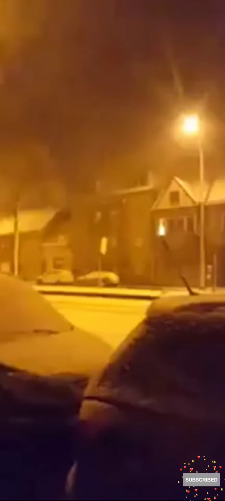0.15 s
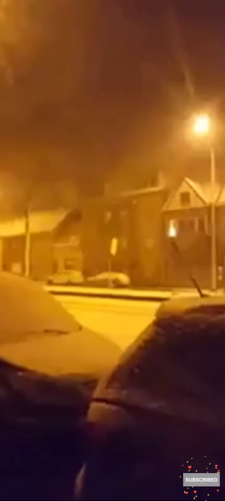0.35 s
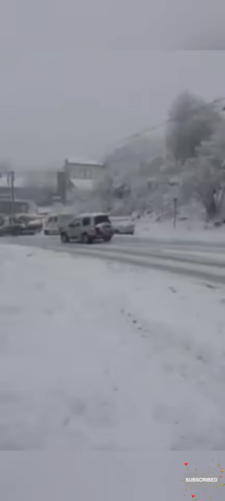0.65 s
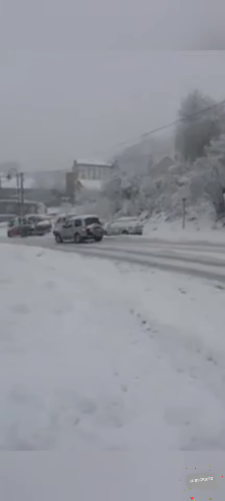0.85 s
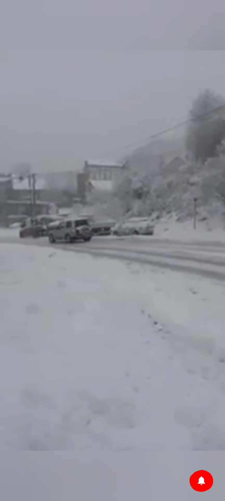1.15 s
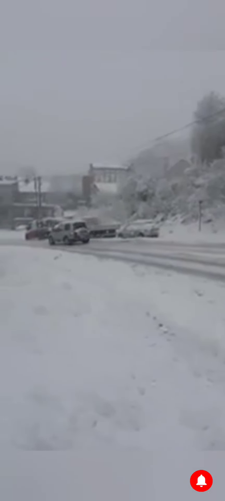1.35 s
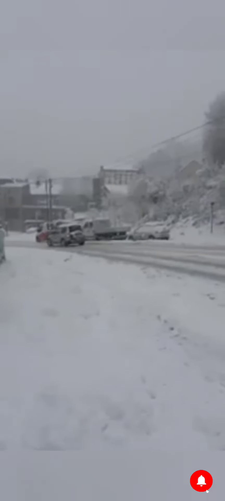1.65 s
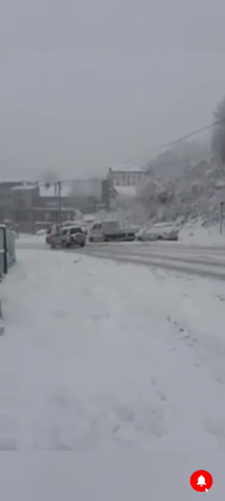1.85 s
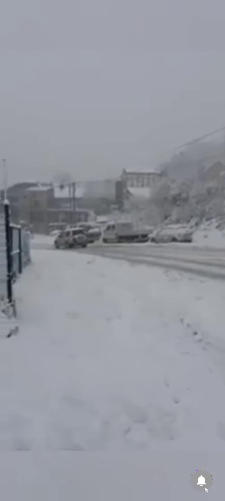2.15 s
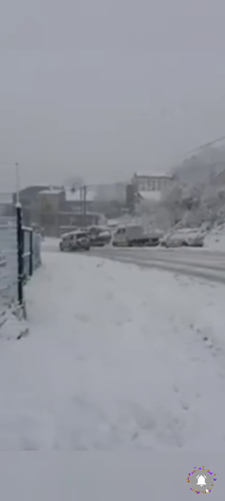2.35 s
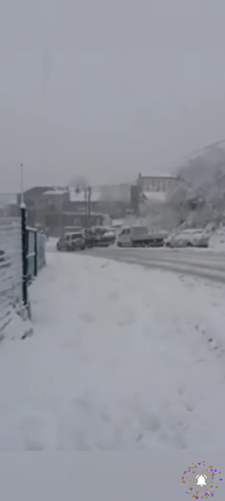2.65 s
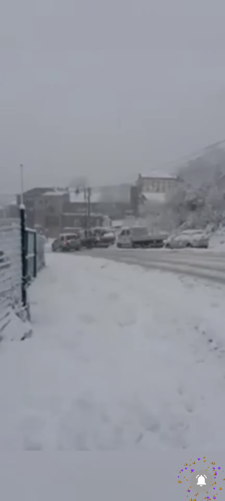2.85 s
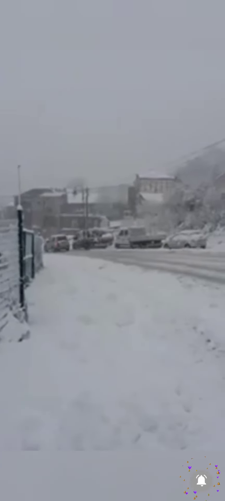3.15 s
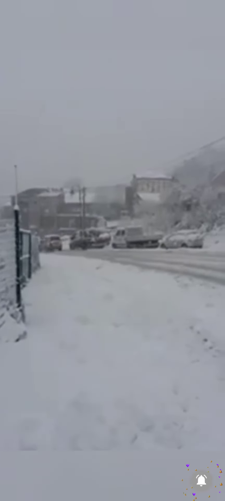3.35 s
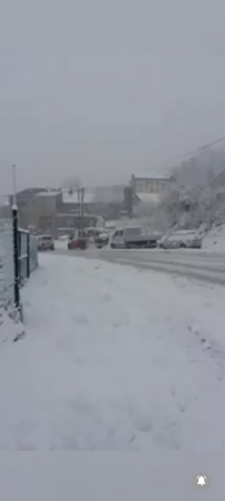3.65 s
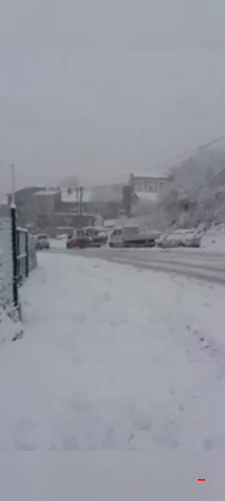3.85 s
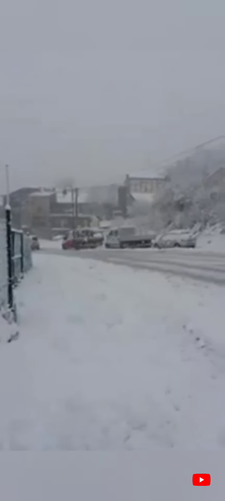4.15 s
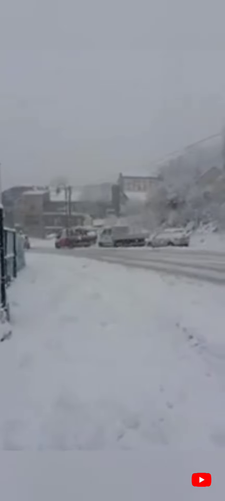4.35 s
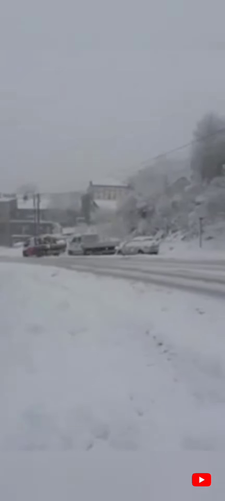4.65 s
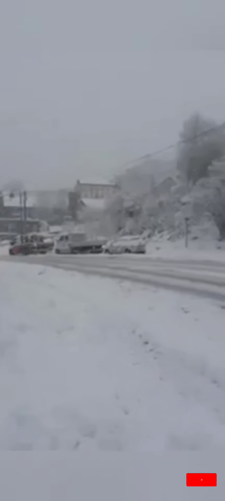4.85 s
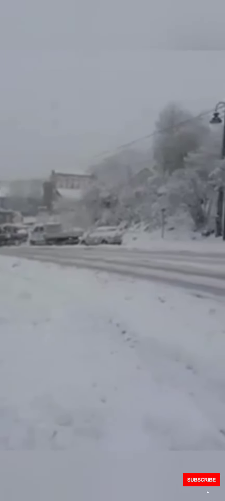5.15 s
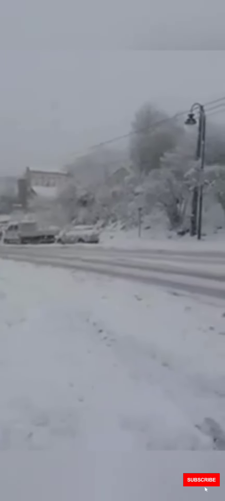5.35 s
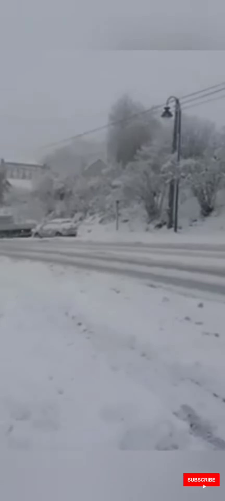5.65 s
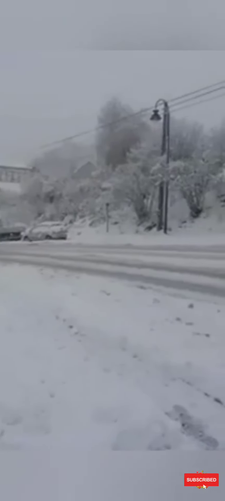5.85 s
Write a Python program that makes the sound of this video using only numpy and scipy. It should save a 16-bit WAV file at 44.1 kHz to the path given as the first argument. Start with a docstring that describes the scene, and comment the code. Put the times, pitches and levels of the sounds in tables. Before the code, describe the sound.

After a moment of quiet, strong wind buffets the microphone and hisses in gusts, with snow ticking and an engine idling faintly.

```python
"""Quiet night air in a snowy street, then a click on the phone and a moment of silence.
A storm gust hits the phone's microphone head on, buffets it and settles into a rushing hiss.
Eddies and blown snow strike the narrow microphone port and take its colour; the port whistles
and sings, and knocks ring the case. Some way off, an engine idles under the wind."""
import sys
import numpy as np
from scipy import signal
from scipy.fft import rfft, irfft
from scipy.io import wavfile
from scipy.ndimage import uniform_filter1d

SR = 44100
rng = np.random.default_rng(int(sys.argv[2]) if len(sys.argv) > 2 else 0)


def inscribe(sig):
    """Save sig as 16-bit PCM at rate SR to the path in sys.argv[1].

    A 1-D sig is mono; a 2-D sig holds one channel per row.
    Samples are clipped to [-1, 1] before scaling.
    """
    pcm = np.round(np.clip(np.atleast_2d(sig).T, -1, 1) * 32767)
    wavfile.write(sys.argv[1], SR, pcm.astype(np.int16))


N = 264908
T, HZ = np.arange(N) / SR, np.fft.rfftfreq(N, 1 / SR)
CLICK_S, NIGHT_END_S, WIND_START_S, PUFF_END_S = .2572, .307, .939, .981

# Levels in the tables are relative; spectra give the level per hertz.
# distant night air: frequency_hz, level_db
NIGHT_SPECTRUM = [(25, -39.5), (60, -15.5), (170, -18), (250, -15.5), (350, -23.5), (800, -24.5),
                  (1850, -30), (2700, -40.5), (4500, -46.5), (6300, -54), (8200, -45), (9800, -45),
                  (11500, -52), (15500, -53)]
# its rise and fall: time_s, level_db
NIGHT_LEVEL = [(0.0, -54.5), (0.114, -49.5), (0.224, -53), (0.256, -52), (0.3, -48.5)]
# light knock on the phone: frequency_hz, level_db
CLICK_SPECTRUM = [(100, 9), (1500, -2), (3000, -16), (6000, -25), (8200, -12), (14000, -15), (16000, -30)]
# partials of the engine down the street: pitch_hz, level_db, waver_hz
ENGINE_PARTIALS = [(39, 2, 0.091), (30, -20, 1.8), (69.5, -2, 4.48), (100, -9.5, 0.63), (131.2, -11, 2.06)]
# street rumble: frequency_hz, level_db
RUMBLE_SPECTRUM = [(15, -37), (30, -13), (60, 7), (100, -15), (160, -1.5), (300, -15), (1000, -68)]
# engine and rumble at the microphone: time_s, level_db
ENGINE_LEVEL = [(2.7, -59), (2.95, -48.5), (6.0, -45)]
# colour of the microphone port: frequency_hz, gain_db
PORT_RESPONSE = [(100, -17), (180, -16.5), (300, -2), (560, -5.5), (900, -14), (1850, -3), (2550, -6),
                 (3080, -16), (5200, -12.5), (7000, -10.5), (8250, 0), (10400, -14.5), (12900, -25),
                 (14300, -65)]
# narrow peaks and dips of port and case: centre_hz, width_hz, gain_db
PORT_RINGS = [(648, 7.7, 4), (1317, 200, 2), (1990, 290, 3), (2430, 260, 5), (5030, 280, 1.5),
              (5750, 570, -5), (8600, 110, 2.5)]
# knocks that ring the case: start_s, pitch_hz, level_db, decay_ms
CASE_KNOCKS = [(1.5377, 1710, -17.5, 6.2), (3.023, 520, -22, 22), (4.308, 2150, -12.5, 3.1)]
# spells of whistling at the port's edge: start_s, end_s, level_db
WHISTLE_SPELLS = [(0.967, 0.985, -20.5), (1.026, 1.074, -30.5), (1.614, 1.85, -47)]
# hoarse tones of air blowing across the port: pitch_hz, width_hz, level_db
SINGING_TONES = [(1972, 140, 2), (2652, 136, 5), (5204, 95, -5.5)]
# hollow moan as the gust dies away: time_s, pitch_hz, level_db
MOAN_GLIDE = [(1.2, 660, -60), (1.249, 617.5, -22.5), (1.309, 608.5, -25.5), (1.349, 506.6, -66),
              (1.411, 425, -25.5), (1.45, 370, -70), (1.49, 337, -44), (1.56, 278, -55)]
# snow and small eddies striking the port: start_s, strength_db, tilt_db (up is brighter), decay_ms
SNOW_STRIKES = [(1.0821, -7.5, 0, 3.7), (1.106, -7, -19, 1.6), (1.219, -8, 10, 1.9), (1.2908, -8, -3, 4.5),
                (1.3973, -19, 8, 4.5), (1.471, -16.5, -3, 3.4), (1.5357, -21.5, 11, 2.7),
                (1.6306, -25, -12, 4.1), (1.9071, -21, -18, 2.9), (2.029, -26, 3, 3.8),
                (2.2458, -16.5, 1, 1.35), (2.717, -20, 13, 2.1), (2.7455, -16.5, 11, 1.6),
                (2.871, -21, -4, 6.7), (2.9311, -16, -18, 5.3), (3.0200, -6.5, 3, 2.4),
                (3.0254, -14, -5, 6.7), (3.1394, -15.5, 18, 2.4), (3.3987, -10, -20, 2.7),
                (4.0590, -10, -13, 3.2), (4.307, -13, 0, 1.2), (4.6729, -17, 5, 1.3),
                (4.8042, -13.5, 12, 2.4), (5.5174, -17.5, 12, 1.7), (5.6258, -17, 5, 1.7),
                (5.9194, -15, 16, 2.5)]
# the wind surges, lulls and settles: time_s, force_db, rush_lift_db
WIND_FORCE = [(1.0, -61, 1.5), (1.018, -35.5, 0), (1.075, -27.5, -0.5), (1.14, -17, 3.5), (1.28, -23, -2),
              (1.331, -21.5, -3.5), (1.52, -28, -3.5), (1.66, -42, 4), (2.0, -41, 3.5), (2.67, -35.5, 2),
              (2.8, -30, -1), (3.6, -27.5, 1.5), (4.25, -30, 0.5), (4.6, -32.5, -2), (4.87, -27, -4),
              (5.48, -29, -2), (5.62, -25, -3), (6.0, -28, 0)]
# low roar against that force: time_s, level_db
ROAR_LEVEL = [(1.0, -9.5), (1.2, -4.5), (1.34, -11), (1.65, -8.5), (2.3, -9), (2.85, -12), (3.4, -11),
              (4.55, -9), (4.9, -11), (6.0, -11)]
# fine fizz against the hiss: time_s, level_db
FIZZ_LEVEL = [(0.95, -15), (1.3, -40), (1.8, -24), (2.3, -21.5), (3.0, -20), (4.1, -21), (4.5, -16.5),
              (6.0, -17)]
# gusts riding on the wind: middle_s, length_s, lift_db, brightness (0 roar to 1 hiss)
GUSTS = [(1.049, 0.045, 5, 0), (1.257, 0.07, 5, 0.92), (1.405, 0.045, 8.5, 0.25), (1.484, 0.14, 7, 0.11),
         (1.932, 0.14, 3, 0.36), (2.104, .16, 4, 1), (2.235, 0.18, 6, 0.68), (2.35, .09, 4.5, .55),
         (2.922, 0.11, 5, 0.46), (3.05, 0.12, 8, 0.78), (3.322, 0.087, 5.5, 0.024), (3.406, 0.29, 5, 1),
         (3.6, 0.1, 3, 0.037), (3.819, 0.18, 4.5, 1), (4.0, .06, 1.5, 0), (4.317, 0.13, 3, 0.55),
         (4.42, 0.19, 9.5, 0.72), (4.598, 0.052, 6, 0.56), (5.143, 0.067, 4.5, 0.57), (5.168, .06, 3, 0),
         (5.368, 0.097, 3.5, 0.92), (5.56, 0.06, 6.5, 0.66), (5.689, .1, 14.5, 0.68),
         (5.918, .11, 6.5, 0.75)]
# the gust that hits the port head on: frequency_hz, level_db
BUFFET_SPECTRUM = [(20, -29), (60, 9.5), (150, 6.5), (220, 4.5), (900, 0), (3000, -32), (6000, -13.5),
                   (15000, -38)]
# its blows: time_s, level_db
BUFFET_LEVEL = [(1.085, -27.5), (1.147, -26), (1.177, -23), (1.199, -36), (1.227, -23), (1.307, -35),
                (1.32, -41)]


def amp(db):
    return 10 ** (np.asarray(db) / 20)


def unit_rms(x):
    return x / np.sqrt(np.mean(x ** 2) + 1e-20)


def shape(points):
    """Gain at every frequency from (frequency_hz, level_db) points."""
    hz, db = np.transpose(points)
    return amp(np.interp(np.log(HZ + 1), np.log(hz), db))


def level(points):
    """Gain at every moment from (time_s, level_db) points."""
    return amp(np.interp(T, *np.transpose(points)))


def between(start_s, end_s, fade_s=.00189):
    """Gate that fades in after the start and out before the end."""
    return np.clip((T - start_s) / fade_s, 0, 1) * np.clip((end_s - T) / fade_s, 0, 1)


def colour(x, gain):
    """Causal filter with the given magnitude."""
    cepstrum = irfft(np.log(np.maximum(gain, 1e-5)), N)
    cepstrum[1:N // 2] *= 2
    cepstrum[N // 2 + 1:] = 0
    return irfft(rfft(x) * np.exp(rfft(cepstrum)), N)


def noise(spectrum):
    """Noise of rms 1 with the given spectrum."""
    return unit_rms(irfft(rfft(rng.standard_normal(N)) * shape(spectrum), N))


def wander(rate_hz):
    """Random drift of rms 1, up to about the given rate."""
    return unit_rms(irfft(rfft(rng.standard_normal(N)) * np.exp(-(HZ / rate_hz) ** 2), N))


def resonance(hz, width_hz):
    """Bell-shaped peak, 1 at its centre."""
    return 1 / (1 + (2 * (HZ - hz) / width_hz) ** 2)


def fuzzy_tone(hz, width_hz):
    """Noise of rms 1 ringing in one resonance."""
    return unit_rms(colour(rng.standard_normal(N), resonance(hz, width_hz)))


def night():
    """Dull distant air; a light knock on the phone leaves a short thin rustle, then all cuts out."""
    air = amp(3.5) * noise(NIGHT_SPECTRUM) * level(NIGHT_LEVEL)
    age = np.maximum(T - CLICK_S, 0)
    click = amp(-28) * np.exp(-age / .0016) * noise(CLICK_SPECTRUM)
    rustle = noise([(1000, -10), (6000, -15), (8200, 0), (10000, -6), (14000, -3), (16000, -20)])
    return (air + (click + amp(-62) * rustle) * (age > 0)) * between(0, NIGHT_END_S)


def engine():
    """Low wavering partials of an engine idling some way off, in the rumble of the street."""
    hum = sum(amp(db) * np.sin(2 * np.pi * np.cumsum(hz + waver_hz * wander(5.7)) / SR)
              for hz, db, waver_hz in ENGINE_PARTIALS)
    street = np.sqrt(2) * amp(1.5) * hum + amp(-4.5) * noise(RUMBLE_SPECTRUM)
    return street * level(ENGINE_LEVEL) * between(WIND_START_S, np.inf)


def case_knocks():
    """Short hollow rings of the phone's case, right at the microphone."""
    return sum(amp(db) * fuzzy_tone(hz, width_hz=610) * (T > s) * np.exp(-1000 * abs(T - s) / decay_ms)
               for s, hz, db, decay_ms in CASE_KNOCKS)


def port_bands(notch_hz=6120, notch_width_hz=635):
    """The narrow port rings and has an anti-resonance; its filters for roar, rush, hiss and fizz."""
    detuning = ((HZ - notch_hz) / notch_width_hz) ** 2
    notch = np.sqrt((detuning + .001) / (detuning + 1))
    rings_db = sum(db * resonance(hz, width_hz) for hz, width_hz, db in PORT_RINGS)
    response = shape(PORT_RESPONSE) * amp(rings_db) * notch
    low, mid, high = (1 / (1 + (HZ / hz) ** order) for hz, order in [(900, 6), (3600, 8), (11300, 24)])
    bands = response * np.sqrt([low, mid * (1 - low), high * (1 - mid), 1 - high])
    spans_hz = [(200, 900), (1200, 3000), (6500, 11000), (11000, 16000)]
    # white noise leaves each filter with rms 1 inside its span
    return [band / np.sqrt(np.mean(band ** 2 * ((HZ > bottom) & (HZ < top))))
            for band, (bottom, top) in zip(bands, spans_hz)]


def whistle():
    """Air on the port's edge gives a thin, fuzzy tone in short spells."""
    spells = sum(amp(db) * between(start, end, fade_s=.008) for start, end, db in WHISTLE_SPELLS)
    return fuzzy_tone(hz=8840, width_hz=150) * spells


def singing(rush):
    """Hoarse pipe tones of the port that swell, for one spell, with the wind crossing it."""
    tones = sum(amp(db) * fuzzy_tone(hz, width_hz) * amp(2 * wander(45))
                for hz, width_hz, db in SINGING_TONES)
    return amp(-8) * unit_rms(tones) * rush * between(2.2, 4.52, fade_s=.38)


def moan(width_hz=68):
    """Narrow turbulence whose pitch sinks as the gust dies away."""
    s, hz, db = np.transpose(MOAN_GLIDE)
    phase = 2 * np.pi * np.cumsum(np.interp(T, s, hz)) / SR
    tone = unit_rms(wander(width_hz) * np.cos(phase) + wander(width_hz) * np.sin(phase))
    return tone * amp(np.interp(T, s, db)) * between(s[0], s[-1])


def snow_ticks(port, attack_s=.0004):
    """Snow and small eddies strike the port: each a puff that dies in a few milliseconds."""
    drive = np.zeros((3, N))
    age = np.arange(SR // 20) / SR
    for start_s, strength_db, tilt_db, decay_ms in SNOW_STRIKES:
        thud_db = -3 + 1.55 * strength_db  # harder strikes have more low body
        shares = amp([thud_db, min(-tilt_db, 0), min(tilt_db, 0)])
        shares /= np.linalg.norm(shares)
        envelope = (1 - np.exp(-age / attack_s)) * np.exp(-1000 * age / decay_ms)
        puff = amp(strength_db) * envelope * rng.choice([-1, 1], len(age))
        start = round(start_s * SR)
        drive[:, start:start + len(age)] += shares[:, None] * puff
    roar, rush, hiss = drive
    return (amp(-1) * colour(roar, port[0]) + amp(-1.5) * colour(rush, port[1])
            + amp(4) * colour(hiss, port[2]) + amp(-12.5) * colour(hiss, port[3]))


def gust_db(brightness, spread=.42):
    """Each gust is a smooth arch that lifts most the range matching its own brightness."""
    lift_db = np.zeros(N)
    for middle_s, length_s, db, own_brightness in GUSTS:
        arch = np.cos(np.pi * np.clip((T - middle_s) / length_s, -.5, .5))
        lift_db += db * arch * np.exp(-((brightness - own_brightness) / spread) ** 2)
    return lift_db


def wind_strengths():
    """Gains of roar, rush and hiss: a first puff that stops short, then the wind with its gusts."""
    s, force, rush_lift = np.transpose(WIND_FORCE)
    force_db, rush_lift_db = np.interp(T, s, force), np.interp(T, s, rush_lift)
    after_puff = np.maximum(T - PUFF_END_S, 0)
    puff = level([(WIND_START_S, -34), (PUFF_END_S, -25.5)]) * np.exp(-after_puff / .0007)
    lingering_roar = amp(-35.5) * np.exp(-after_puff / .022)
    roar = amp(force_db + gust_db(0)) * level(ROAR_LEVEL) + lingering_roar
    rush = (amp(force_db + gust_db(.34)) + puff) * amp(rush_lift_db)
    hiss = amp(force_db + gust_db(.98)) + puff
    return np.array([roar, rush, hiss]) * between(WIND_START_S, np.inf)


def airflow(eddies_db, flutter_db, grain_share, grains_per_s=1500):
    """Turbulent noise with fine snow grains in it, pulsing with the eddies and its own flutter."""
    grains = rng.standard_normal(N) * (rng.random(N) < grains_per_s / SR)
    grains *= amp(4.5 * np.minimum(rng.exponential(1, N), 4))  # a few land much harder
    flow = np.sqrt(1 - grain_share) * rng.standard_normal(N) + np.sqrt(grain_share) * unit_rms(grains)
    return unit_rms(flow * amp(eddies_db + flutter_db * wander(81)))


def patchy_colour(x, depth_db):
    """Narrow ranges of pitch swell and fade at random for some tens of milliseconds."""
    spectra = signal.stft(x, nperseg=512, noverlap=384)[2]
    patches = uniform_filter1d(rng.standard_normal(spectra.shape), size=3, axis=0)  # across pitch
    patches = unit_rms(uniform_filter1d(patches, size=22, axis=1))  # across time
    return signal.istft(spectra * unit_rms(amp(depth_db * patches)), nperseg=512, noverlap=384)[1][:N]


def wind(port, roar, rush, hiss):
    """Storm wind right on the port: the same eddies shake its roar, rush, hiss and fizz."""
    eddies_db = unit_rms(wander(29) + 1.4 * wander(240))
    fizz = hiss * level(FIZZ_LEVEL) * amp(.17 * gust_db(1))  # bright gusts add extra fizz
    flows = [roar * amp(-.5) * airflow(eddies_db, flutter_db=.5, grain_share=.15),
             rush * amp(-2) * airflow(eddies_db, flutter_db=-.52, grain_share=.21),
             hiss * amp(-.53) * airflow(eddies_db, flutter_db=.87, grain_share=.11),
             fizz * amp(2) * airflow(eddies_db, flutter_db=1, grain_share=.14)]
    return patchy_colour(sum(colour(flow, band) for flow, band in zip(flows, port)), depth_db=1.69)


def buffet(port, clicks_per_s=170):
    """Lumpy pressure straight on the membrane, with a hard, bright crackle and a faint fizz after it."""
    lumps = amp(4) * unit_rms(noise(BUFFET_SPECTRUM) * amp(2 * wander(100))) * level(BUFFET_LEVEL)
    heights = rng.choice([-1, 1], N) * rng.uniform(.44, 1, N)
    clicks = unit_rms(heights * (rng.random(N) < clicks_per_s / SR))
    crackle = amp(-24.5) * colour(clicks, port[1]) + amp(-35) * clicks
    fizz = amp(-54) * noise([(6000, -30), (9000, -8), (15500, 5)]) * amp(2.5 * wander(120))
    blast = (lumps + crackle) * between(1.083, 1.31, fade_s=.0037)
    return blast + fizz * between(1.3, 1.57, fade_s=.03)


def scene():
    """One phone microphone in the street: wind and snow up close, night air and engine beyond."""
    port = port_bands()
    roar, rush, hiss = wind_strengths()
    storm = wind(port, roar, rush, hiss) + singing(rush) + whistle() + moan() + buffet(port)
    return (night() + storm + snow_ticks(port) + case_knocks() + engine())[None]


def record(dry):
    """The phone rounds off the loudest peaks, then cuts the highest treble."""
    ceiling, cutoff_hz = .75, 15700
    rounded = dry / (1 + (dry / ceiling) ** 4) ** .25
    lowpass = signal.firwin(1023, cutoff_hz, window=("kaiser", 9), fs=SR)
    return signal.oaconvolve(rounded, lowpass[None], "same")


dry = scene()
out = record(dry)
inscribe(out)
```